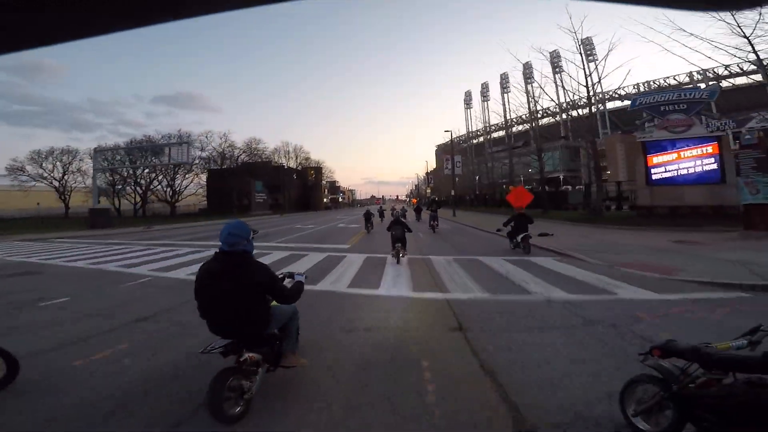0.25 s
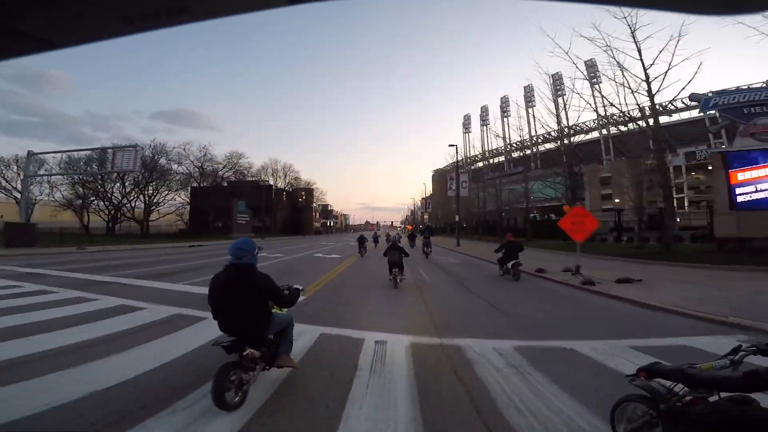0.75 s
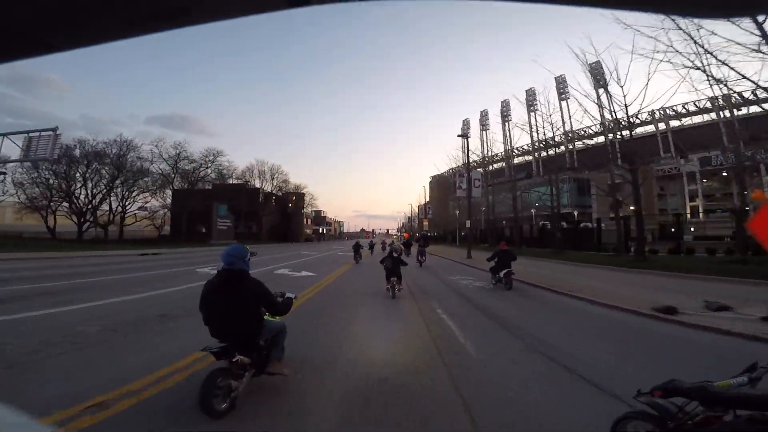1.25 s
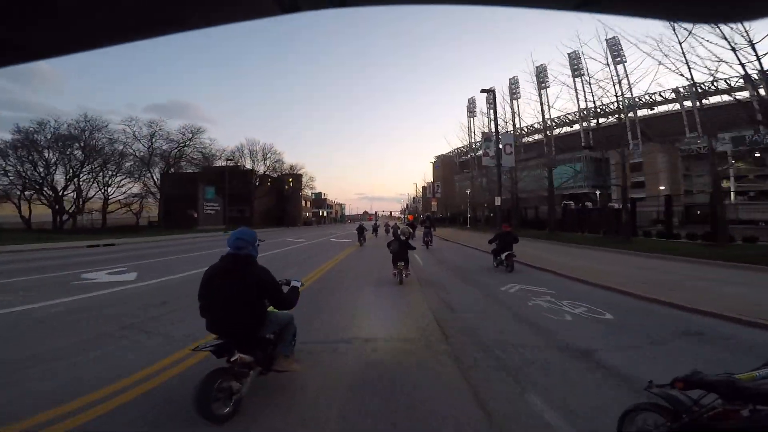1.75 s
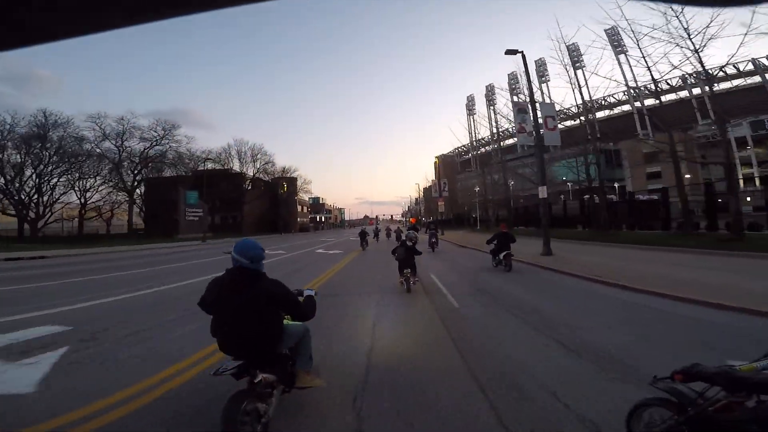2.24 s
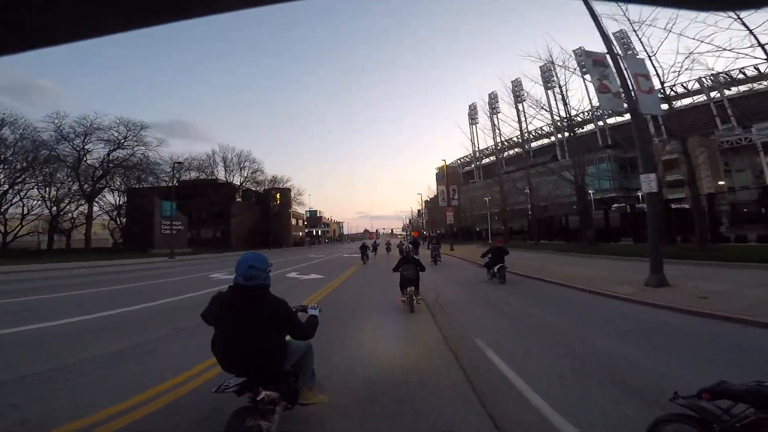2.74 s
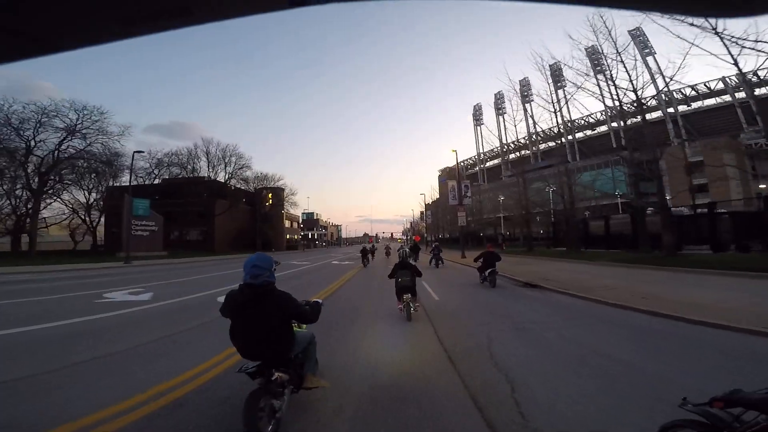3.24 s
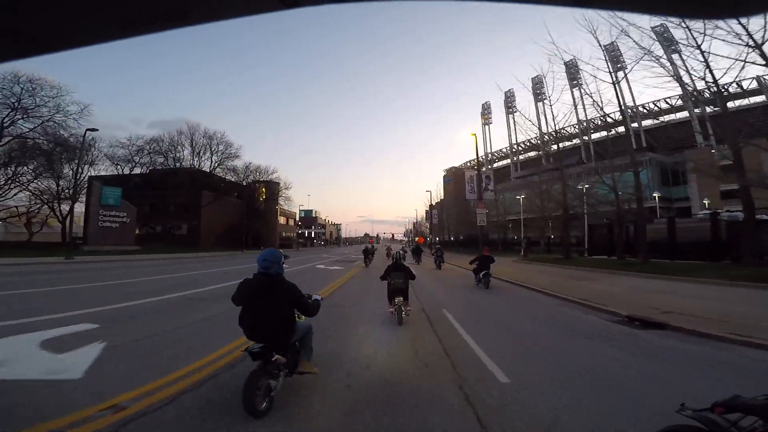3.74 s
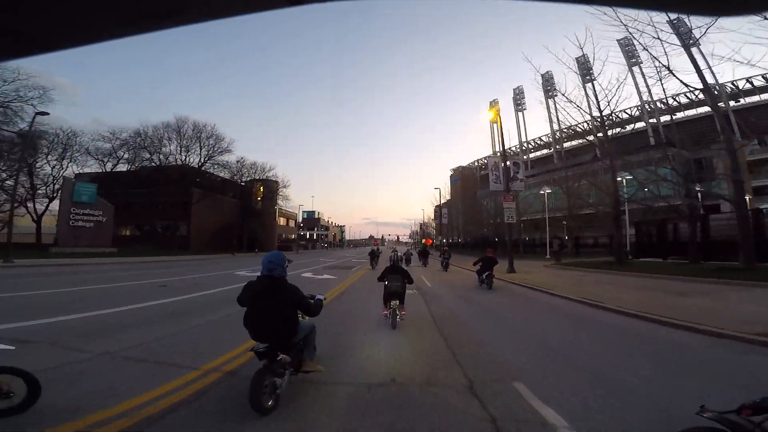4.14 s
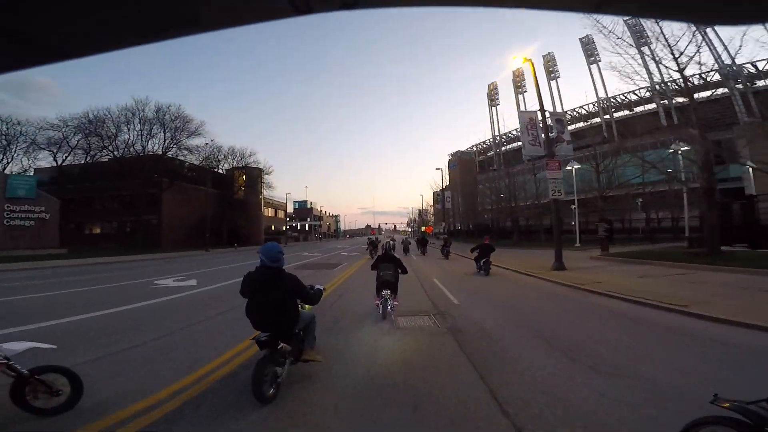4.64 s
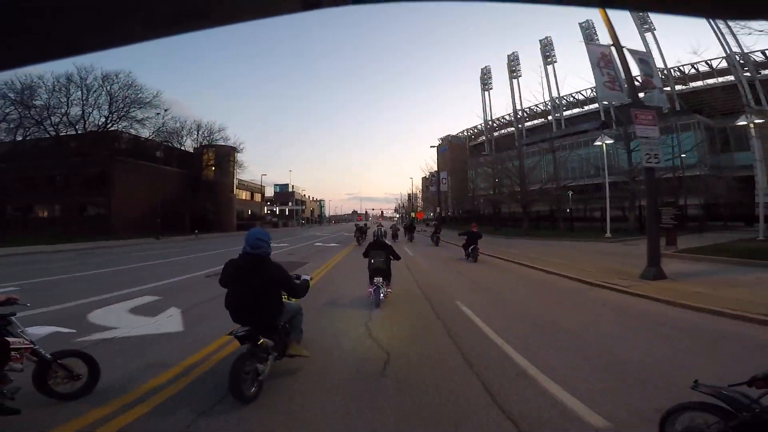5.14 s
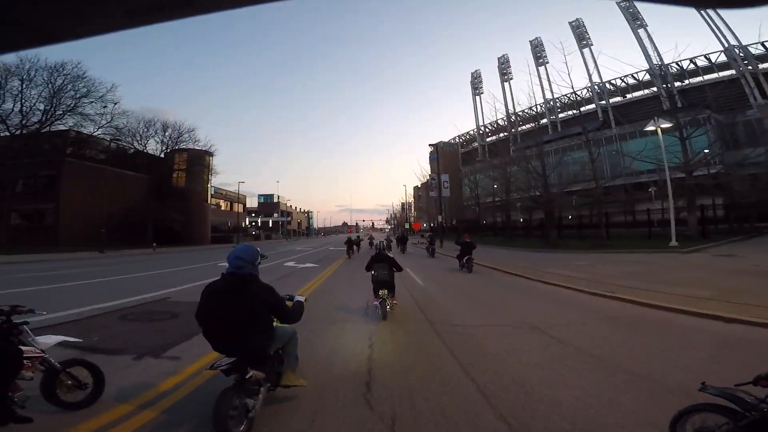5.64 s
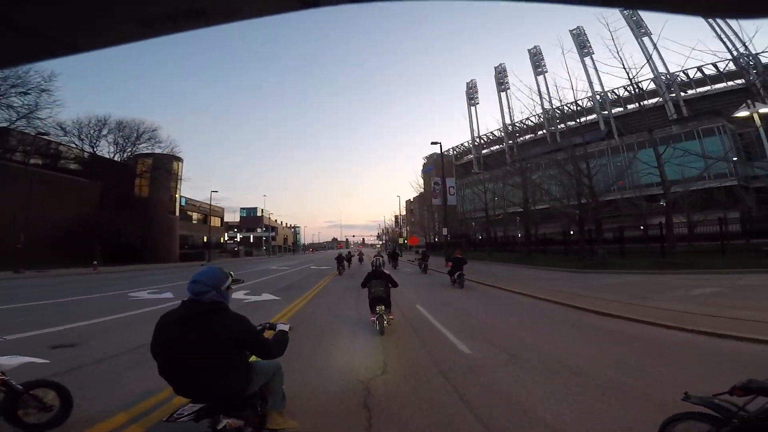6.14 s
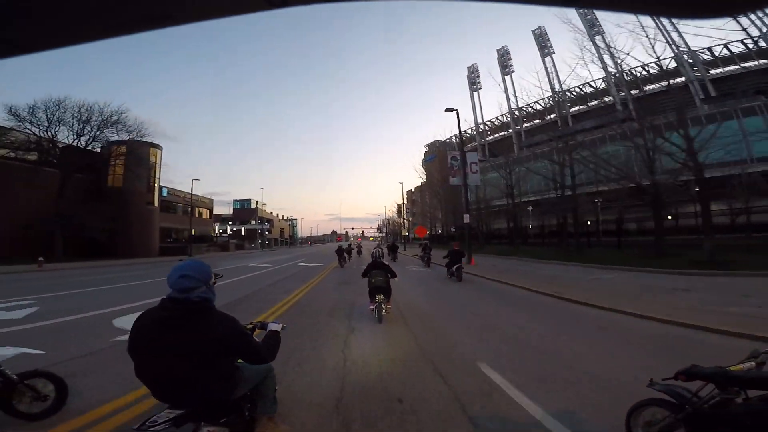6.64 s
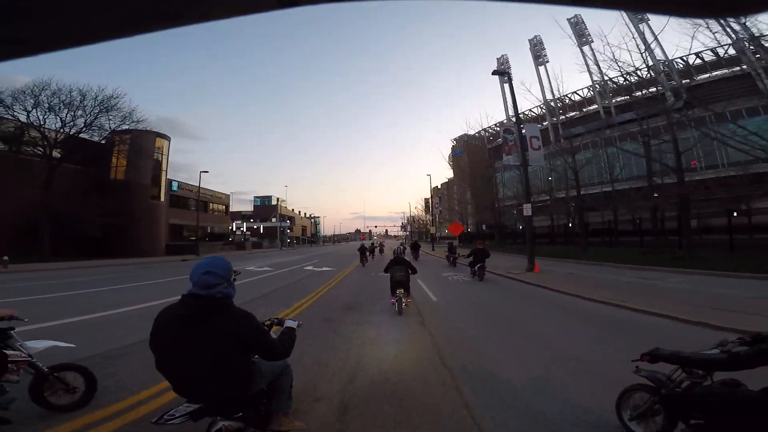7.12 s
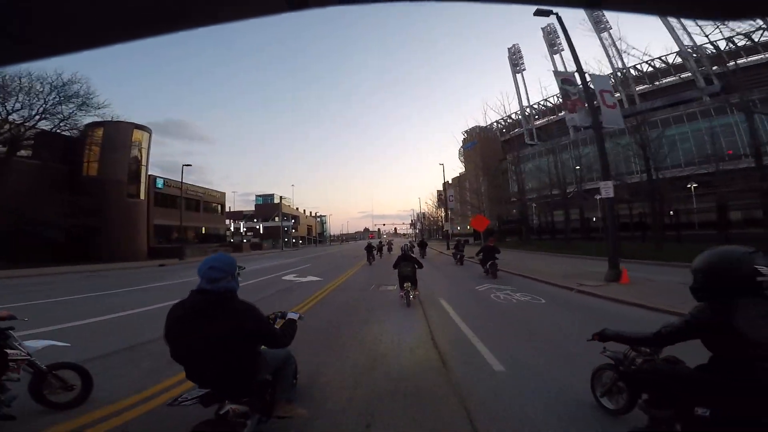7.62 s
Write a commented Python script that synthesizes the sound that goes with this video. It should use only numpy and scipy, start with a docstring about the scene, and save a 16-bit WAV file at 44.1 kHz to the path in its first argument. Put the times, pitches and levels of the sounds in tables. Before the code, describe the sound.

Dense, throbbing small-motorbike engines heard from a moving helmet: one close bike surges up in pitch, falls, blips and coasts while others drone around it.

```python
"""A pack of small single-cylinder motorbikes cruises down a wide street, heard from one rider's helmet.
The nearest engine, pulse trains through pipe resonances, opens and shuts its throttle, then revs up near 3 s.
It falls back, blips near 4 s, coasts and opens again from 5.5 s; valve knocks and pings, decaying sines, dot it.
Three cruisers thump around it until the middle one fades near 5.8 s; the slowest swells at the end.
Shaped noise for wind, far pack and tyres fills the gaps throughout; a gain control and limiter hold the level."""
import sys
import numpy as np
from scipy import signal
from scipy.fft import rfft, irfft, next_fast_len
from scipy.io import wavfile
from scipy.ndimage import uniform_filter1d, minimum_filter1d, map_coordinates

SR = 44100
rng = np.random.default_rng(int(sys.argv[2]) if len(sys.argv) > 2 else 0)


def to_wav(sig):
    """Store sig (one row per channel, or 1-D mono) as 16-bit WAV at the path in sys.argv[1].

    Samples outside -1..1 are clipped; the rate is SR.
    """
    pcm = np.clip(np.atleast_2d(sig), -1, 1) * 32767
    pcm = np.round(pcm).astype(np.int16)
    wavfile.write(sys.argv[1], SR, pcm.T)  # frames by channels


N = 347508

# colour of tyres, chains and air, also lent to the cruisers' clatter: (frequency [Hz], density [dB per Hz])
HISS_COLOUR = [(300, -4.5), (700, -3), (1000, -4.5), (1400, -10), (1900, -14.5), (2300, -19.5),
               (3300, -19.5), (4500, -26.5), (5300, -24), (5900, -18.5), (7400, -19), (8400, -28.5),
               (10000, -33), (13000, -44.5), (20000, -57)]


def amp(db):
    """dB to gain."""
    return 10 ** (np.asarray(db) / 20)


def unit(x):
    """x at rms 1."""
    return x / np.sqrt(np.mean(x ** 2) + 1e-20)


def along(points, hz):
    """Read a (Hz, value) curve on a log frequency axis."""
    f, v = np.transpose(points)
    return np.interp(np.log(hz + 1), np.log(f + 1), v)


def curves(rows):
    """One automation curve, a value per sample, for each column after the time."""
    s, *cols = np.transpose(rows)
    return [np.interp(np.arange(N) / SR, s, c) for c in cols]


def wobble(rate):
    """A smooth random curve with rate knots a second."""
    knots = rng.standard_normal(int(N * rate / SR) + 4)
    return map_coordinates(knots, [np.arange(N) * rate / SR])


def scattered(train, db):
    """The impulses, each at its own random strength, spread by db."""
    return train * amp(db * rng.standard_normal(N))


def filtered(x, response):
    """x times a complex response of frequency, padded so that tails do not wrap round."""
    m = 2 * next_fast_len(N // 2 + SR // 4)
    return irfft(rfft(x, m) * response(np.fft.rfftfreq(m, 1 / SR)), m)[..., :N]


def colour(points):
    """The zero-phase response with the given (Hz, dB) gain."""
    return lambda hz: amp(along(points, hz))


def causal(points):
    """The minimum-phase response with the given (Hz, dB) gain: it rings only after its impulse."""
    def response(hz):
        cepstrum = irfft(np.log(amp(along(points, hz))))
        # fold the cepstrum onto positive time
        cepstrum[1:len(hz) - 1] *= 2
        cepstrum[len(hz):] = 0
        return np.exp(rfft(cepstrum))
    return response


def port_noise(gate, response):
    """Gated noise at two microphone ports, rms 1, less alike at some frequencies than at others."""
    # correlation of the ports: (frequency [Hz], left-right likeness [0-1])
    likeness = [(300, 1), (600, 1), (980, 0.61), (1960, 0.37), (3930, 0.88), (7900, 0.072), (12000, 0.17)]

    def mid_side(hz):
        turn = np.arccos(np.clip(along(likeness, hz), -1, 1)) / 2
        return response(hz) * np.array([np.cos(turn), np.sin(turn)])

    mid, side = filtered(gate * rng.standard_normal((2, N)), mid_side)
    return unit(np.array([mid + side, mid - side]))


def firings(rate_hz, start, jitter, scatter_db):
    """One impulse per combustion, each off by a share of a cycle and in strength; start = share already gone."""
    cycles = np.cumsum(rate_hz) / SR + start
    at = np.flatnonzero(np.diff(np.floor(cycles), prepend=-1))
    luck = rng.standard_normal((len(at), 2))
    late = luck[:, 0] * jitter * SR / rate_hz[at]
    train = np.zeros(N)
    train[np.clip(at + late, 0, N - 1).astype(int)] = amp(scatter_db * luck[:, 1])
    return train


def puffs(train, t60):
    """A gate that every impulse opens and that falls 60 dB in t60 seconds."""
    return signal.lfilter([1], [1, -amp(-60 / (t60 * SR))], train)


def thumps(train, pipe, lag):
    """Impulses through a pipe whose silencer smears each: lows trail the 500 Hz front, scaled by lag [s]."""
    def response(f):
        smear = np.exp(-2j * np.pi * lag * (250 * np.log(1 + f / 250) - f / 3))
        return causal(pipe)(f) * smear
    return unit(filtered(train, response))


def near_bike():
    """The nearest engine: exhaust, bark, air-box ring and valve clatter share the same firings."""
    # the rider's hand: (time [s], firing rate [Hz], throttle [0-1])
    ride = [(0.0, 46.3, .82), (.15, 46.9, .84), (.33, 48.4, .97), (.47, 49.3, .75), (.55, 47, .3),
            (.65, 45.3, .55), (1.15, 44.3, .55), (1.55, 42.8, .15), (1.85, 43.1, .54), (2.2, 43.5, .6),
            (2.36, 43.7, .74), (2.45, 44.7, .9), (2.6, 46.3, .9), (2.67, 50.1, .92), (2.75, 54.3, .93),
            (2.82, 57.4, .88), (2.88, 59.6, .88), (2.95, 60.1, .96), (3.008, 60, .95), (3.025, 59.8, .5),
            (3.15, 58, .3), (3.6, 47.7, .1), (3.85, 44.96, .6), (3.95, 45, .72), (4.05, 45.42, .95),
            (4.14, 45.8, .86), (4.22, 46, .4), (4.6, 43.4, .2), (5.2, 40.76, .15), (5.45, 38.5, .5),
            (6.0, 38.9, .67), (7.2, 39.6, .74), (7.88, 39.6, .68)]
    # exhaust pipe as heard through the housing: (frequency [Hz], gain [dB])
    near_pipe = [(25, -21), (50, -14.5), (88, 1), (118, -1), (140, -10.5), (180, -10.5), (230, -10),
                 (300, -16), (360, -10), (420, -4), (480, -9), (540, -11.5), (600, -19), (650, -33.5),
                 (720, -39.5), (1200, -59), (20000, -110)]
    # intake and pipe-mouth resonances: (frequency [Hz], gain [dB])
    bark_colour = [(500, -40), (760, -15), (900, -2), (1060, -1), (1200, -7), (1420, -.5), (1640, -15),
                   (1780, -6), (2080, -8), (2300, -30), (2900, -27), (3400, -18), (4300, -31), (20000, -90)]
    # valve gear: (frequency [Hz], density [dB per Hz])
    clatter_colour = [(1500, -47.5), (2600, -15.5), (3500, -1.5), (4600, -6), (5400, -11.5), (6000, -2),
                      (7000, 1), (8300, -11.5), (10000, -20), (14000, -37.5)]
    # air-box resonance: (frequency [Hz], gain [dB])
    air_box = [(600, -35), (900, -13), (1020, -1.5), (1130, -9), (1600, -40), (20000, -89.5)]
    # uneven air-box ring, not driven by the throttle: (time [s], level [dB])
    air_box_level = [(0, -46.5), (.22, -42.5), (.33, -37.5), (.45, -40.5), (.58, -50.5), (.75, -43.5),
                     (1.2, -42), (1.55, -44.5), (1.9, -44.5), (2.1, -51.5), (2.6, -43.5), (3.0, -43.5),
                     (3.15, -56), (3.9, -51.5), (4.05, -40), (4.25, -52), (5.2, -48), (6, -56.5),
                     (7.88, -58.5)]

    hz, throttle = curves(ride)

    def opened(shut_db, open_db):
        return np.interp(throttle, [0, 1], [shut_db, open_db])

    # with the throttle open, exhaust and bark also grow with the revs, in dB per Hz
    rev_from_hz, bark_top_hz = 43.7, 58.5
    exhaust_db = opened(-26.5, -11) + 0.1 * throttle * np.maximum(hz - rev_from_hz, 0)
    bark_db = opened(-61, -44.5) + 0.8 * throttle * (np.minimum(hz, bark_top_hz) - rev_from_hz)
    clatter_db = opened(-71.5, -47)

    train = firings(hz, start=.06, jitter=.003, scatter_db=.8)
    exhaust = thumps(train, near_pipe, lag=.017)

    # a pitched bark with a rough breath on each firing
    bark_pulses = unit(filtered(scattered(train, 1.5), causal(bark_colour)))
    bark_breath = port_noise(puffs(train, t60=.04), causal(bark_colour))
    bark = bark_pulses + .6 * bark_breath

    # low and high clatter vary from firing to firing, each in its own way
    split_hz, clatter_gain = 4700, colour(clatter_colour)
    low = port_noise(puffs(scattered(train, 2.5), t60=.021), lambda f: clatter_gain(f) * (f < split_hz))
    high = port_noise(puffs(scattered(train, 2.5), t60=.021), lambda f: clatter_gain(f) * (f >= split_hz))
    clatter = high + amp(-10) * low

    air_ring = unit(filtered(scattered(train, 3), causal(air_box)))
    return (amp(exhaust_db) * exhaust + amp(curves(air_box_level)[0]) * air_ring
            + amp(bark_db) * bark + amp(clatter_db) * clatter)


def knocks():
    """The nearest engine's hardest valve knocks: each rings three close cylinder-head modes."""
    # (time [s], peak level [dB], middle mode [Hz])
    knock_list = [(0.0627, -31, 6520), (0.1265, -31, 6410), (0.2122, -30.5, 6140), (0.2328, -28, 6680),
                  (0.2745, -34.5, 7180), (0.3154, -34.5, 7200), (0.336, -32, 6800), (2.4543, -34, 7190),
                  (2.4986, -33.5, 7050), (2.6083, -34.5, 5900), (2.7268, -31, 6178), (2.801, -34, 6620),
                  (3.984, -31.5, 6060), (4.0271, -34, 6050), (4.0505, -30, 5920), (4.1149, -32.5, 7090),
                  (4.1366, -33.5, 6140), (5.9443, -35, 7400), (6.0476, -34.5, 6240), (7.169, -32, 5960)]
    t60, spread = .014, .07  # s; share by which the modes lie apart
    out, t = np.zeros((2, N + SR)), np.arange(SR // 30) / SR
    envelope = amp(-60 * t / t60) * (1 - np.exp(-t / .0005))
    # every mode starts at its own phase in each port
    luck = rng.random((len(knock_list), 2, 3))
    for (s, db, hz), turns in zip(knock_list, luck):
        modes = hz * (1 + spread * np.array([-1, 0, 1]))[:, None]
        knock = np.sin(2 * np.pi * (modes * t + .5 * turns[..., None])).sum(axis=1) * envelope
        out[:, round(s * SR):][:, :len(t)] += amp(db) * knock / np.abs(knock).max()
    return out[:, :N]


def cruiser(rows, pipe, clatter_db):
    """A cruising engine further off: thumps through its pipe and a faint clatter, swelling and sinking."""
    hz, exhaust_db = curves(rows)
    speed = 1 + .0013 * wobble(2.5)  # the firing rate wanders slightly
    train = firings(hz * speed, rng.random(), jitter=.004, scatter_db=.7)
    clatter = port_noise(puffs(train, t60=.092), colour(HISS_COLOUR))
    exhaust = thumps(train, pipe, lag=.024)

    # the bass surges on its own, as road and walls reflect it
    bass_hz, bass_drift_db, bass_drift_rate = 200, 2.5, 4  # rate in knots a second
    bass = filtered(exhaust, lambda f: 1 / (1 + (f / bass_hz) ** 4))
    exhaust = exhaust - bass + amp(bass_drift_db * wobble(bass_drift_rate)) * bass

    # the whole engine drifts in level as the riders shift about
    drift_db = 1.5 * wobble(2.495)
    return amp(exhaust_db + drift_db) * (exhaust + amp(clatter_db) * clatter)


def pack():
    """Three cruisers whose different firing rates beat against one another."""
    # engines, levels before their drift: (time [s], firing rate [Hz], exhaust level [dB])
    fast = [(0.0, 59.76, -18), (0.5, 59.87, -18), (1.0, 60.9, -16.5), (1.6, 60.92, -18.5),
            (2.0, 60.82, -20), (2.3, 59.74, -19), (2.7, 58.8, -23.5), (2.95, 58.65, -24.5),
            (3.1, 58.52, -20.5), (4.8, 58.26, -17.5), (6.4, 58.36, -17), (7.0, 57.2, -17),
            (7.4, 56.35, -16.5), (7.88, 55.5, -18.5)]
    middle = [(0.0, 41.38, -21), (0.7, 43.19, -16), (1.15, 44.32, -15.5), (1.36, 42.29, -19),
              (2.3, 42.61, -17), (2.75, 41.93, -23), (2.98, 41.6, -26.5), (3.1, 41.32, -20),
              (3.55, 41, -16.5), (4.2, 41.61, -15.5), (5.1, 40.71, -17.5), (5.65, 41.32, -14.5),
              (5.9, 41.03, -45)]
    slow = [(0.0, 33.38, -21.5), (.7, 34.49, -20.5), (2.0, 36.1, -19), (2.5, 36.41, -20),
            (2.75, 36.54, -26), (3.0, 36.56, -22.5), (3.12, 36.61, -19), (3.4, 36.73, -21.5),
            (4.3, 36.61, -18.5), (4.9, 35.81, -21.5), (5.6, 34, -20), (6.4, 35.44, -21),
            (7.3, 37.09, -18.5), (7.88, 37.25, -13.5)]
    # exhaust pipes as heard through the housing: (frequency [Hz], gain [dB])
    fast_pipe = [(25, -31), (60, -10), (118, 0.5), (180, -8.5), (330, -9.5), (410, -6.5), (470, -2.5),
                 (550, -7), (660, -19), (900, -45.5), (1200, -52), (20000, -110)]
    middle_pipe = [(25, -24.5), (42, -6), (84, -1.5), (130, -3), (250, 1), (360, -15.5), (420, -6),
                   (550, -19), (680, -21.5), (1200, -63.5), (20000, -110)]
    slow_pipe = [(20, -29), (70, -12.5), (140, 3), (220, -5.5), (290, -0.5), (400, -9.5), (470, -14.5),
                 (560, -16), (700, -29.5), (1200, -65.5), (20000, -110)]
    # clatter is relative to each exhaust
    return (cruiser(fast, fast_pipe, clatter_db=-37.0)
            + cruiser(middle, middle_pipe, clatter_db=-31.0)
            + cruiser(slow, slow_pipe, clatter_db=-42.5))


def ticks():
    """Single short pings, fast-decaying sines, like grit striking the housing."""
    # (time [s], peak level [dB], ring frequency [Hz])
    tick_list = [(1.6965, -36.5, 3200), (1.9592, -33, 3200), (1.9775, -31, 3150), (2.4874, -35, 2900),
                 (6.9828, -27, 2800), (7.0778, -28.5, 3150), (7.1255, -31.5, 2950), (7.1484, -28.5, 2950),
                 (7.1965, -37, 3400)]
    out, t = np.zeros(N + SR), np.arange(SR // 50) / SR
    envelope = amp(-60 * t / .004) * (1 - np.exp(-t / .0002))
    for s, db, hz in tick_list:
        ping = envelope * np.sin(2 * np.pi * hz * t)
        out[round(s * SR):][:len(t)] += amp(db) * ping / np.abs(ping).max()
    return out[:N]


def street():
    """Unevenly gated noise: far pack and wind as a lumpy roar, a rough growl, and hiss of tyres, chains and air."""
    # far pack and wind: (frequency [Hz], density [dB per Hz])
    roar_colour = [(12, -14), (25, -3), (50, -1), (110, 3), (200, -4), (330, -11), (500, -11), (640, -19),
                   (840, -29), (1500, -45), (20000, -120)]
    # upper growl of the far pack: (frequency [Hz], density [dB per Hz])
    growl_colour = [(450, -27.5), (640, -1), (760, 1), (950, -8.5), (1250, -8.5), (1600, -17.5),
                    (2400, -39.5), (20000, -100)]
    # background faders: (time [s], level [dB])
    roar_level = [(0.0, -18.5), (.45, -18), (.8, -16), (1.3, -13.5), (1.9, -16.5), (2.3, -16.5),
                  (2.7, -17.5), (3.0, -17.5), (3.15, -15.5), (3.8, -14.5), (5.8, -13), (6.5, -14),
                  (7.1, -15), (7.88, -13)]
    growl_level = [(0, -44), (.5, -42), (.8, -37.5), (1.5, -38), (2.2, -44), (2.7, -47.5), (3.0, -50),
                   (3.3, -43), (4.0, -42), (5.2, -41), (6.2, -44.5), (7.88, -45.5)]
    hiss_level = [(0.0, -39.5), (0.6, -40.5), (1.3, -38), (2.0, -38.5), (2.9, -41), (3.1, -41.5),
                  (3.4, -41.5), (4.1, -37.5), (4.7, -40.5), (5.7, -39), (7.88, -39)]

    lumps = amp(1.6 * wobble(3.14) + 0.86 * wobble(12))
    roar = port_noise(lumps, colour(roar_colour))
    roughness = amp(2 * wobble(7) + 3.5 * wobble(40))
    growl = port_noise(roughness, colour(growl_colour))
    grit = amp(0.65 * wobble(3.5) + 1.3 * wobble(35) + 1.6 * wobble(250))
    hiss = port_noise(grit, colour(HISS_COLOUR))
    return (amp(curves(roar_level)[0]) * roar + amp(curves(growl_level)[0]) * growl
            + amp(curves(hiss_level)[0]) * hiss)


def scene():
    """Four engines, the knocks, the ticks and the street."""
    return near_bike() + knocks() + pack() + ticks() + street()


def record(dry):
    """Two unequal ports, a gain control, a limiter that ducks the loudest thumps, and a band limit."""
    # port balance: (frequency [Hz], left minus right [dB])
    tilt = [(60, 0.0), (100, 0.0), (180, -0.5), (310, -1.0), (520, -3.3), (900, -6.0), (1550, 0.5),
            (2670, 1.5), (4590, 0.5), (7500, 1.0), (8800, -1.5), (12000, 0)]
    # port phase: (frequency [Hz], left lead [rad])
    lead = [(20, 0), (500, -.05), (860, .8), (1120, 1.1), (2330, 1.2), (2760, -.3), (4310, 0)]

    # 4 ms fade at both ends
    t = np.arange(N) / SR
    dry = dry * np.clip(np.minimum(t, t[::-1]) / .004, 0, 1)

    # each port takes half of every difference
    half = np.array([[.5], [-.5]])
    x = filtered(dry, lambda hz: amp(half * along(tilt, hz)) * np.exp(1j * half * along(lead, hz)))

    # gain control: level it aims at [dB], share of the departure it removes, its memory [s]
    level_db, levelling, memory_s = -10, 0.6, 0.1
    keep = np.exp(-1 / (memory_s * SR))
    power = signal.lfilter([1 - keep], [1, -keep], np.mean(x ** 2, axis=0), zi=[amp(2 * level_db)])[0]
    x = x * amp(-levelling * (10 * np.log10(power) - level_db))

    # limiter: the lowest gain needed nearby, smoothed over 600 samples
    need = np.minimum(1, .96 / (np.abs(x).max(axis=0) + 1e-9))
    gain = uniform_filter1d(minimum_filter1d(need, size=600), size=600)
    return filtered(x * gain, lambda hz: (hz > 12) & (hz < 14400))


dry = scene()
out = record(dry)
to_wav(out)
```